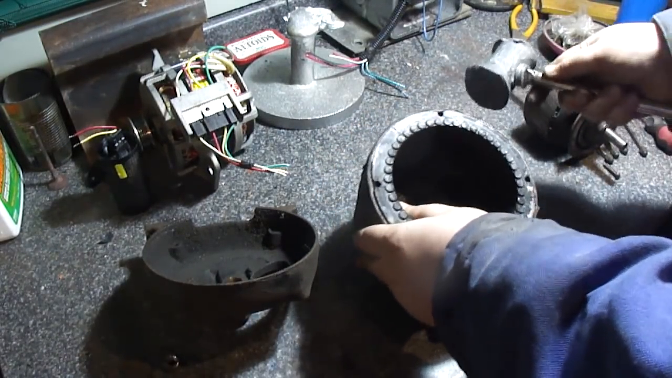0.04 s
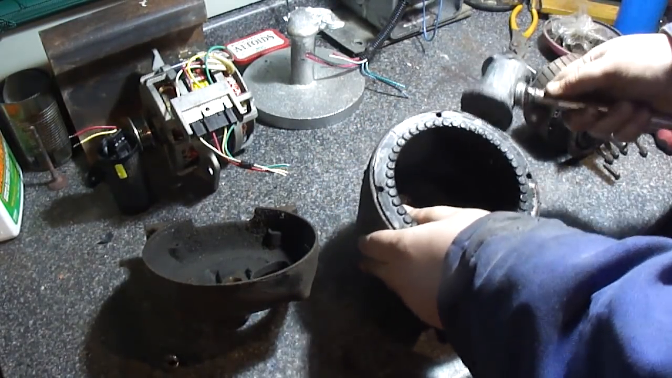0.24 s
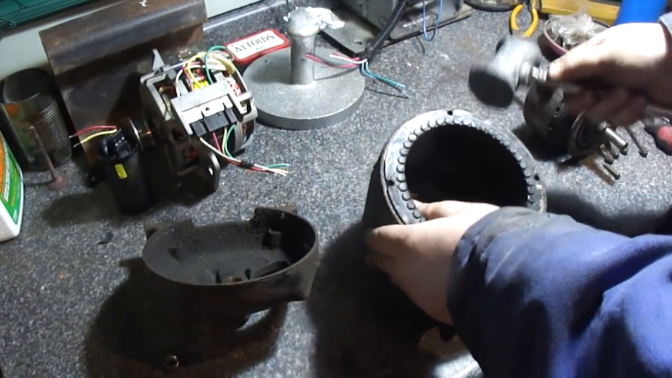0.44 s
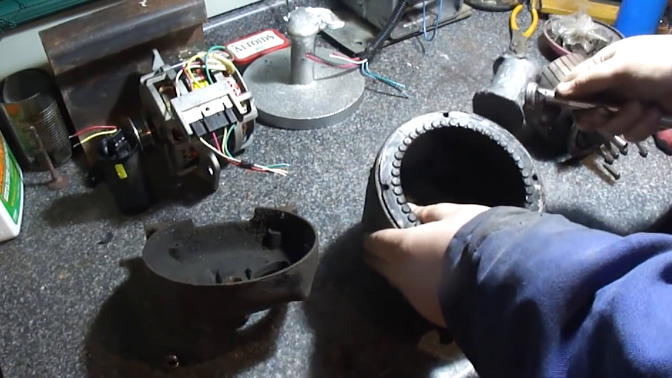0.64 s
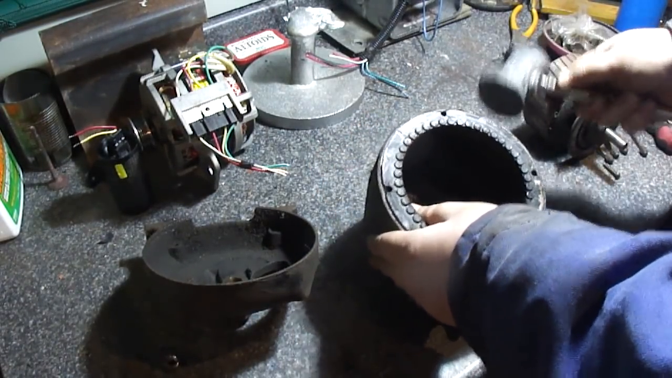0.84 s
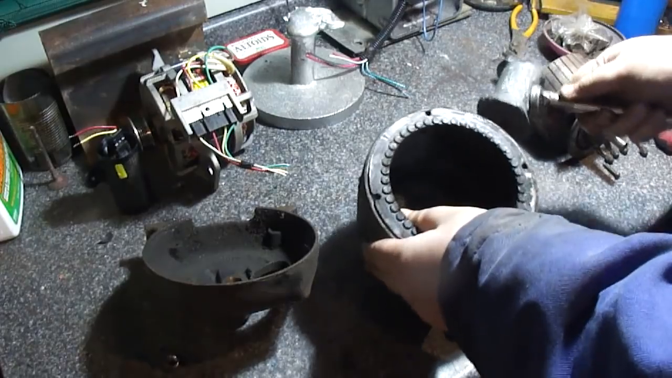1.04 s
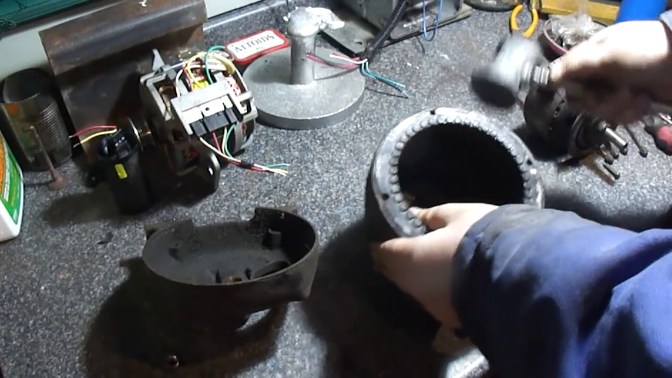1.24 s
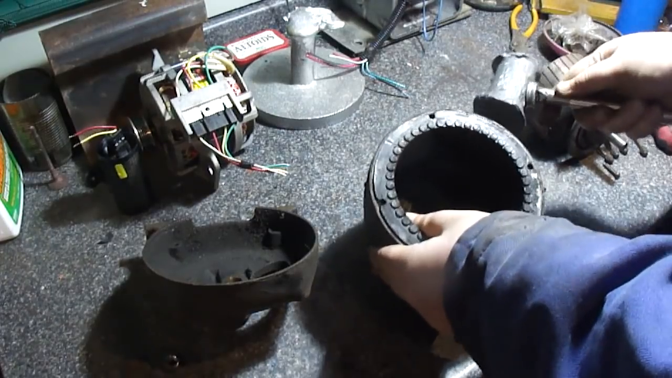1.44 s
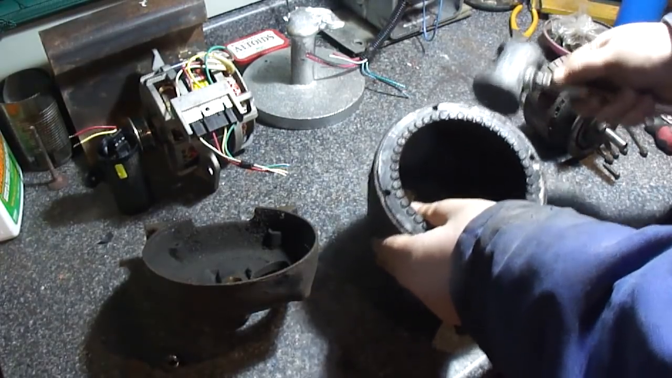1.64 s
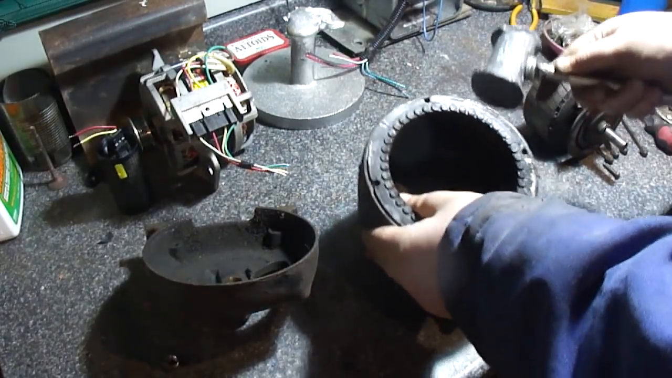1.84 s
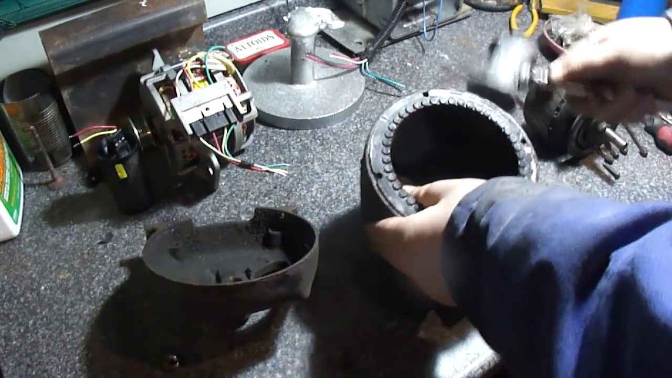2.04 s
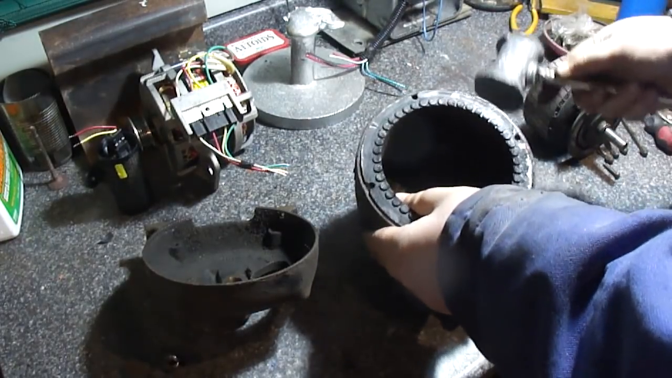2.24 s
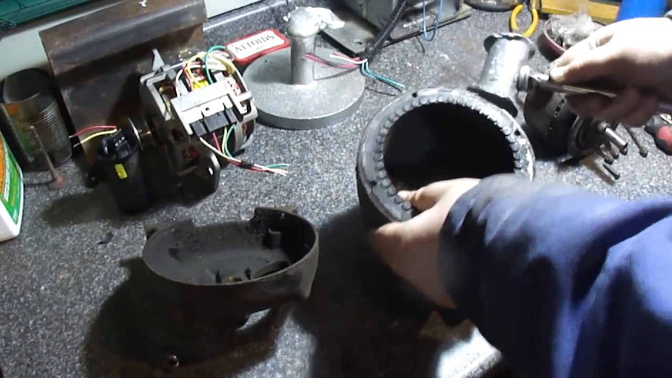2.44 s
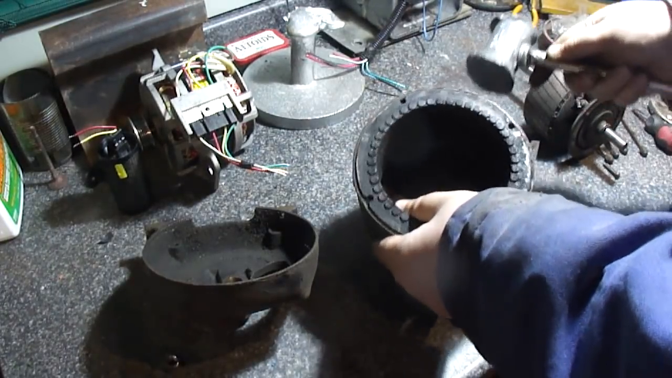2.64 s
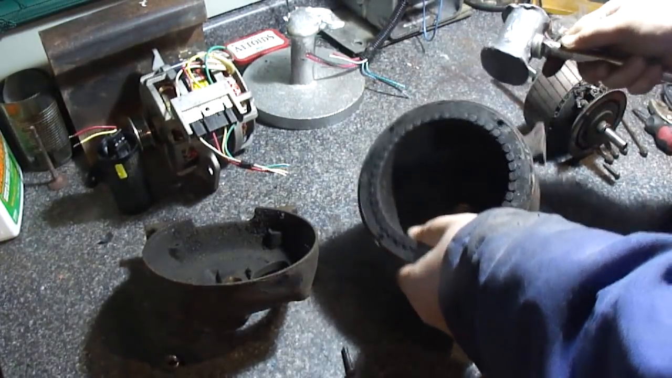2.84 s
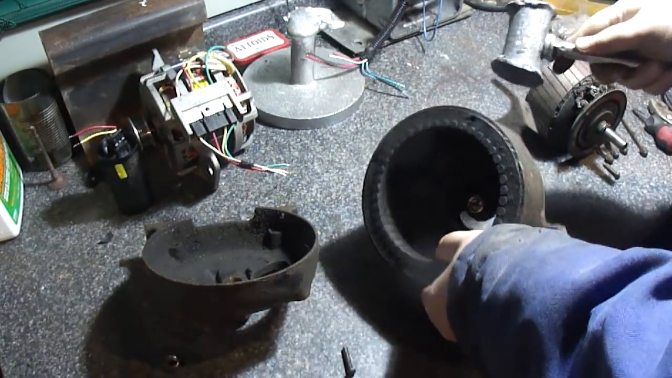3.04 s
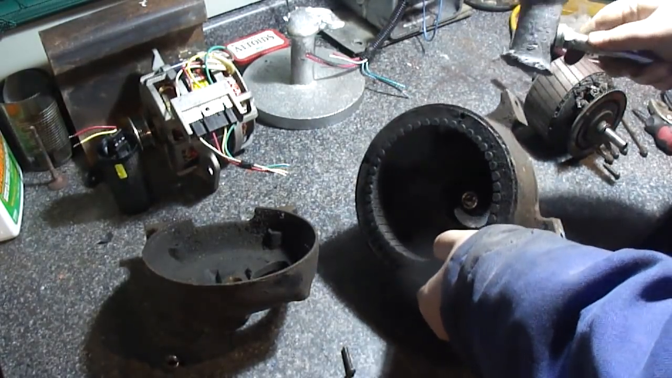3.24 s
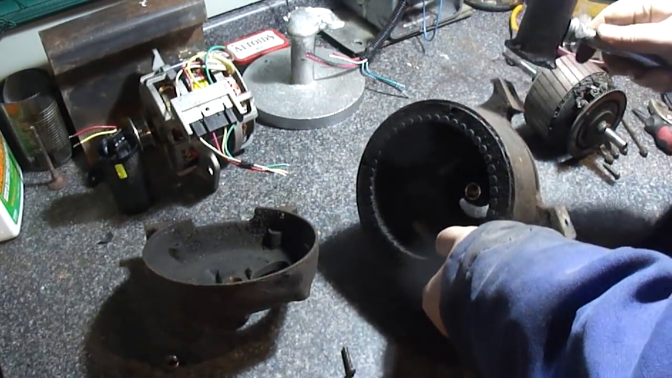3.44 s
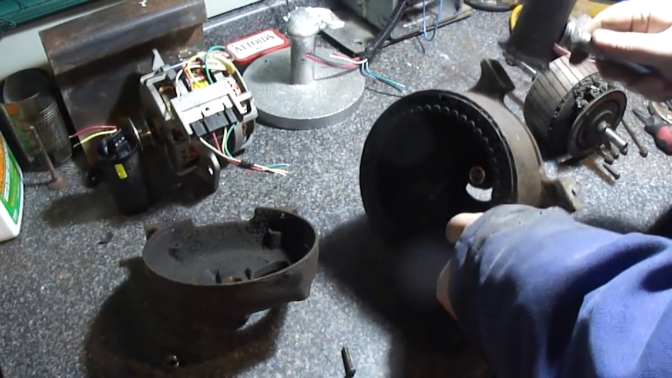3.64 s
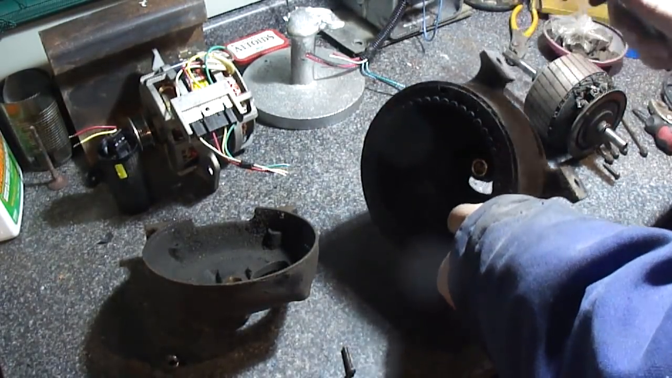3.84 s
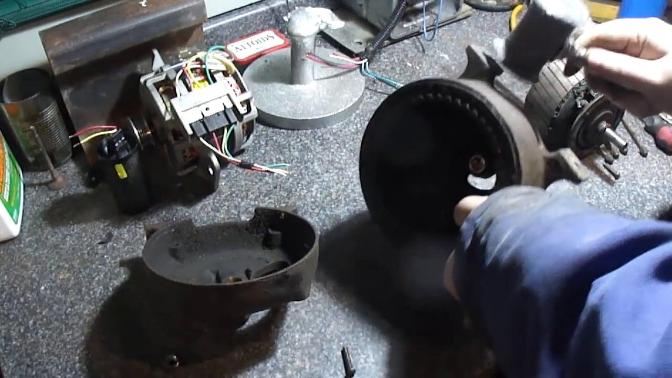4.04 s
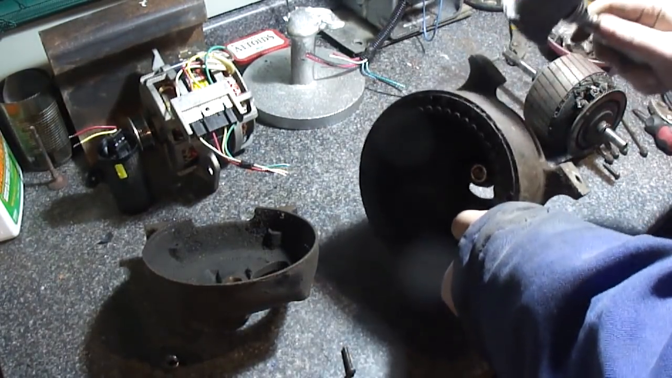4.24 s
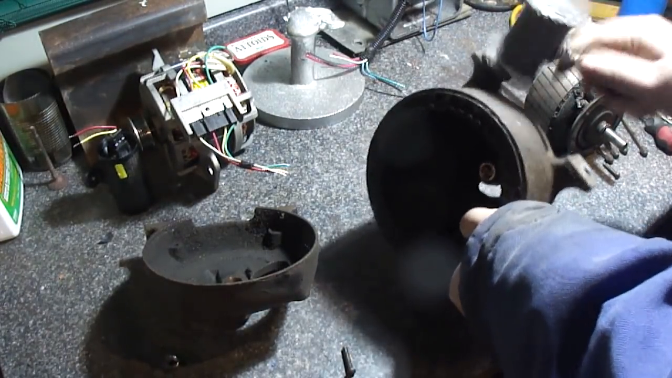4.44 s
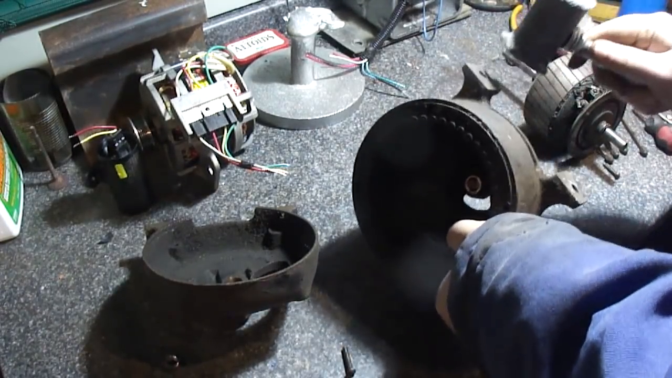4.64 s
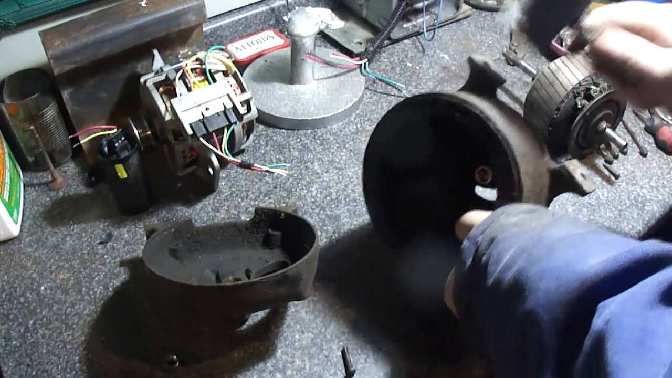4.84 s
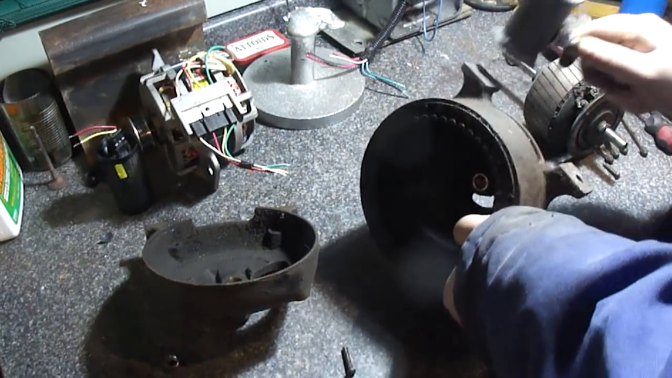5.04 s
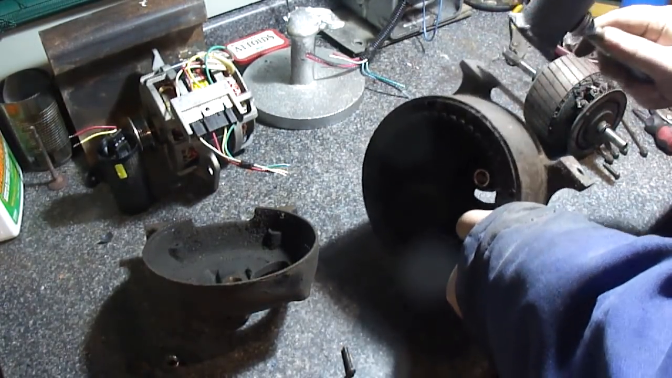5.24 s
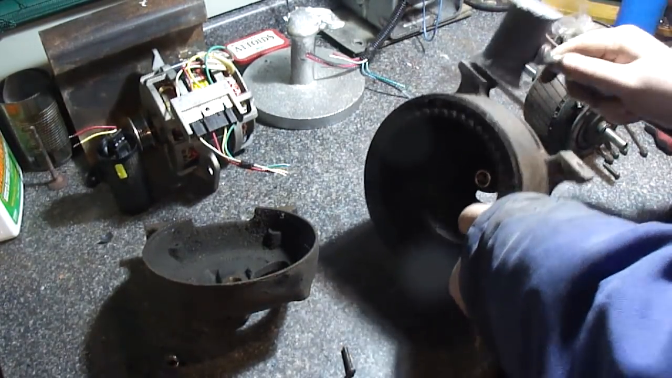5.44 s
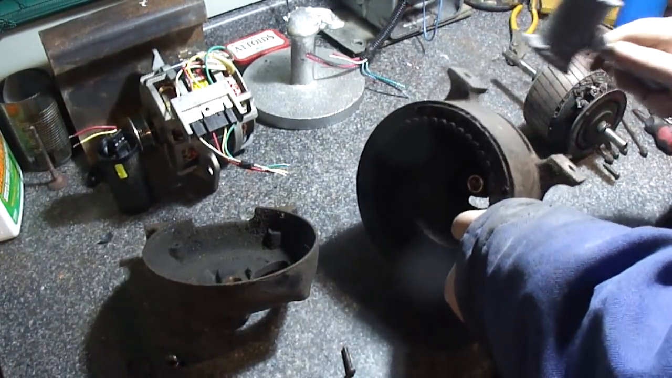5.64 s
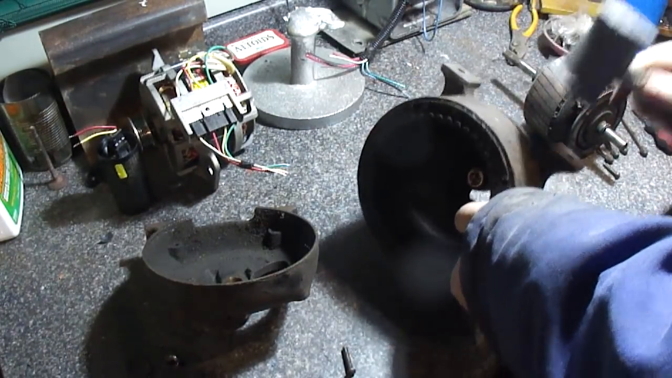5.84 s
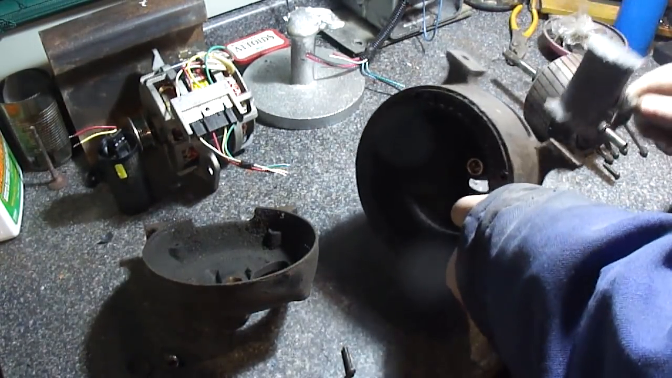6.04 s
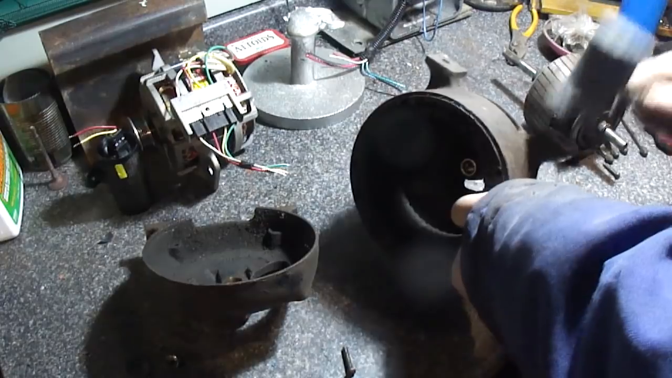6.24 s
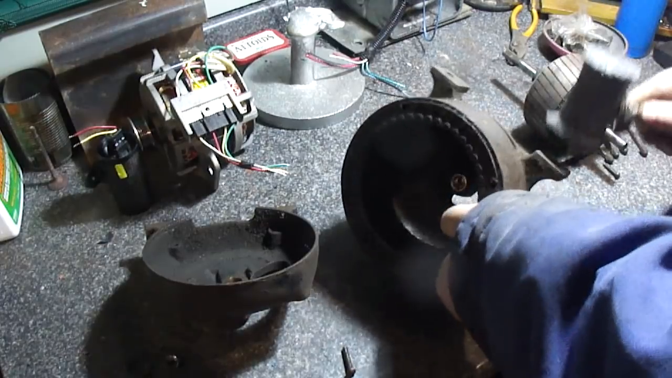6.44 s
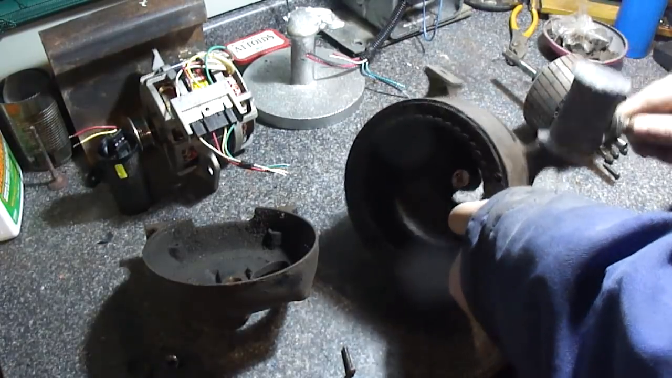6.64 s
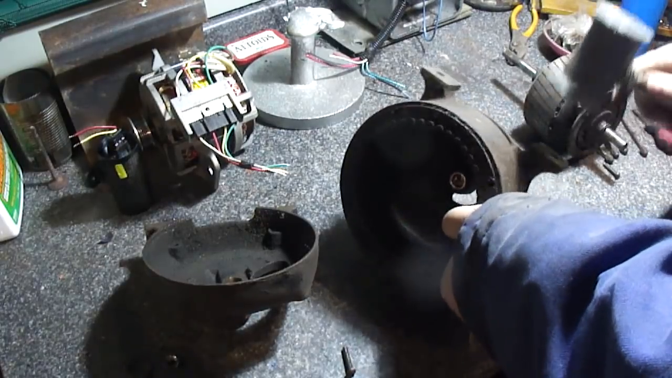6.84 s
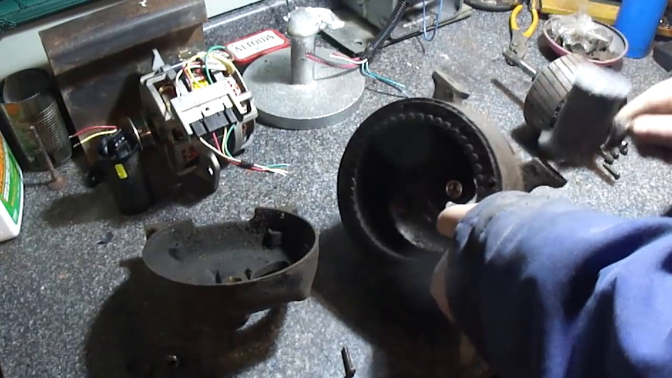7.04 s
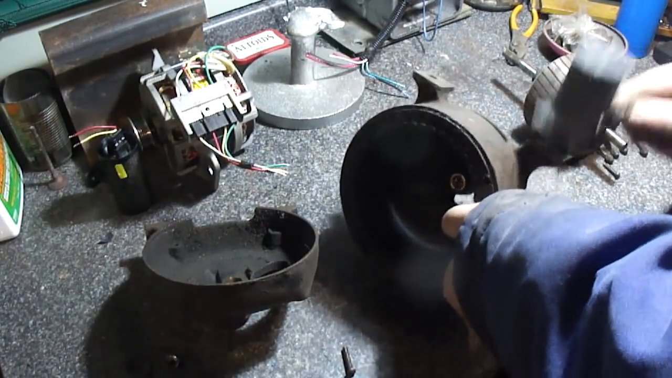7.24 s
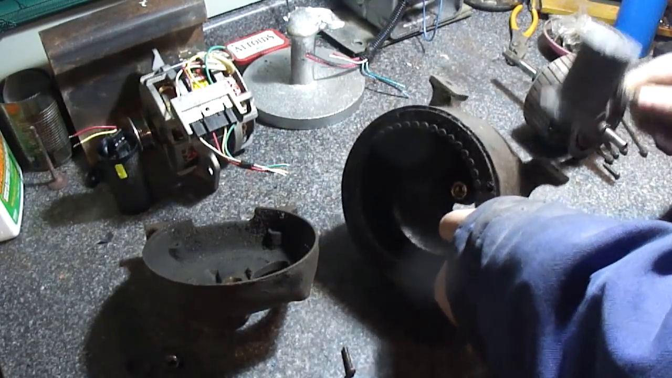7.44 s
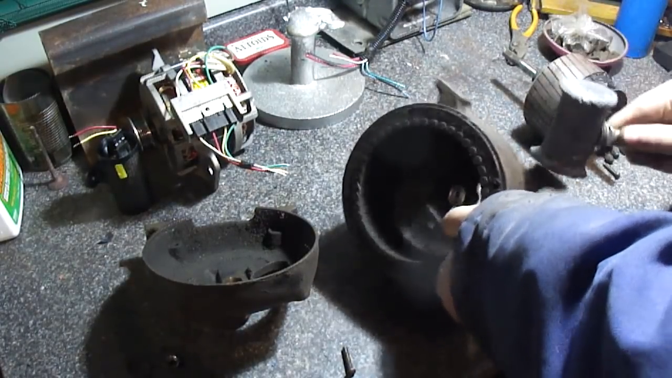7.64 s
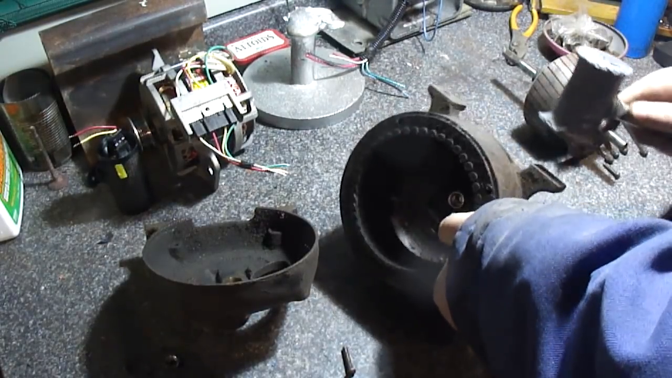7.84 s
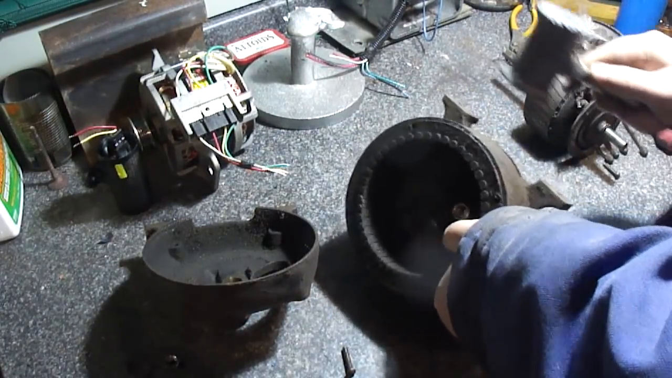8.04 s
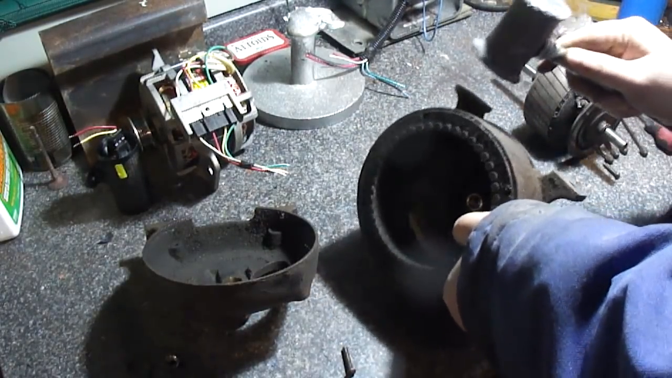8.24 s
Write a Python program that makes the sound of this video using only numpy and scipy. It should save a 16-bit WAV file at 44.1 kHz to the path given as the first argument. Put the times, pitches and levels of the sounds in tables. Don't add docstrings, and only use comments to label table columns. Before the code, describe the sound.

In a hard, echoing workshop, a mallet hits a heavy metal housing at an even pace, about every 0.4 seconds, with cracking attacks, short mid-pitched rings and dull bench thuds. After a pause and a knock as the piece is turned, four slower, sharper blows follow, then six quicker, grittier ones. It ends with a light set-down knock. The close microphone clamps each blow and lifts the room echo, over low steady noise.

```python
import sys
import numpy as np
from scipy import signal
from scipy.io import wavfile
from scipy.ndimage import uniform_filter1d

SR = 44100
rng = np.random.default_rng(int(sys.argv[2]) if len(sys.argv) > 2 else 0)


def dump_mix(stems):
    frames = np.atleast_2d(stems).T
    limited = np.clip(frames, -1, 1)
    pcm = np.round(limited * 32767).astype(np.int16)
    wavfile.write(sys.argv[1], SR, pcm)


def magnitude_from_level(level_db):
    exponent = np.asarray(level_db, float) / 20
    return 10 ** exponent


N = 366471
SIZE = 2 ** 15

# start in seconds, blow strength in dB, bench thud in dB, ring in
# dB, brightness in dB per octave. The first falls before the scene opens.
LYING_FLAT_BLOWS = [
    (-.17, -4, -4, -1.5, -4.5),
                    (0.2, 2, -4.5, -2, -6.5),
    (.547, 4.5, -4, -4.5, -5.5),
    (.939, 2.5, -5, -2.5, -5),
    (1.335, 3, -9, -1.5, -1),
    (1.735, 1, -33, 2, 3),
    (2.1147, -4.5, -40, 2.5, -6),
    (2.474, 4, -34, 2, -3),
]
# start in seconds, blow strength in dB,
# low ring in dB, ring in dB, brightness in dB per octave.
TILTED_BLOWS = [
    (4.029, 2, 11.5, -14, -6),
    (4.507, 2, -22, 0.8, -6),
    (4.946, 2.5, -12, 3.5, -5),
    (5.405, -0.2, -2, 2.1, -5.5),
]
RIM_BLOWS = [
    (5.959, -1.5, -10, 0.5, -1.5),
    (6.334, -3.5, -5, 0.5, 0.5),
    (6.684, -3.5, 2.5, -1, -0.5),
    (7.008, 1.5, -3.5, -0.5, -0.5),
    (7.328, -4.5, 7.5, -5.5, -2),
    (7.644, -0.8, -23, 2, -0.5),
]
# frequency in Hz, level in dB per Hz.
BODY_FLAT = [(88, -99.5), (150, -63), (569, -23), (692, -18), (1220, -17.5), (1620, -6.5), (1840, -16.5),
             (2820, -32), (3430, -32.5), (5250, -44), (10500, -62), (13600, -99), (22000, -120)]
BODY_TILTED = [(88, -113.5), (150, -63), (521, -26), (704, -12), (919, -11.5), (1620, -5), (1910, -13),
               (2580, -7), (3190, -15), (5160, -19), (10500, -32), (13600, -74), (22000, -120)]
BODY_RIM = [(88, -95.5), (150, -52.5), (521, -17.5), (704, -2.5), (903, -2), (1220, 4.5), (2160, -5),
            (3490, -8), (3950, -13), (7900, -21.5), (10500, -36.5), (13600, -60), (22000, -120)]
# frequency in Hz, t60 in seconds, level in dB flat, tilted, on the rim.
CASTING_MODES = [(721, 0.09, -31, -16.5, -13), (1115, 0.049, -34.5, -2.5, -3.5),
                 (1202, 0.11, -13.5, -39, -15), (1380, 0.027, -27, -14, -16),
                 (1422, 0.039, -49.5, 2.5, -16), (1520, 0.013, 8.5, -4, -25.5), (1634, 0.15, 3.5, -6, -30),
                 (1633, 0.17, 2, -11.5, -17.5), (1653.4, 0.081, 2, -5.5, -9), (1706, 0.047, 7, 0.5, -7.5),
                 (2560, 0.019, -10, 1, 2.5), (3397, 0.032, -19.5, -5, -4), (3470, 0.036, -14, -21, -8),
                 (4160, 0.045, -26.5, -15, -18), (4410, 0.028, -15.5, -16, -10),
                 (5100, 0.0091, -20.5, -12, -13.5), (6280, 0.011, -26, -13, -14)]
# frequency in Hz, level in dB per Hz.
FACE_RAISED = [(35, -11.5), (60, -59.5), (272, -13), (1290, 10.5), (3200, -5), (5150, -5.5), (8830, -67),
               (10500, -40), (13600, -64), (22000, -120)]
FACE_FLAT = [(35, -33), (60, -40.5), (954, 7), (1900, -9.5), (2360, 5), (4520, -17), (9220, -51.5),
             (10500, -38), (13600, -91), (22000, -120)]
# level in dB flat, tilted, on the rim.
CRACK_DB = [-11, -3, -10]
SIZZLE_DB = [-10.5, -12.5, -0.5]


def blow(row, posture, walls):
    s, strength_db, low_db, ring_db, bright_db = row
    hz, t60, *levels = np.transpose(CASTING_MODES)
    low_shift_db = (low_db - 2.0) * (posture > 0)
    high_shift_db = bright_db * np.log2(hz / 1500) * 0.53
    mode_db = levels[posture] + np.where(hz < 1500, low_shift_db, high_shift_db) + ring_db - 16.0
    sound = soft(ring(hz, t60, mode_db), 0.0012)
    body = [BODY_FLAT, BODY_TILTED, BODY_RIM][posture]
    dense = burst(body, 1, 12.37, bright_db + 3.5, chatter=0)
    sound = sound + dense
    if posture == 0:
        sound = sound + bench(0.86, low_db - 6.5)
    crack_db = CRACK_DB[posture] - 0.8 * strength_db
    face = FACE_RAISED if posture else FACE_FLAT
    crack = burst(face, 0.0037, 16.5 + crack_db, bright_db - 0.8, chatter=0.08)
    sizzle = burst(TICK_COLOUR, 0.077, 17.0 + crack_db + SIZZLE_DB[posture], 0.83, chatter=0.88)
    wet = in_shop(sound, walls, 1.8, same=0.43)
    wet = wet - 0.47 * dense
    return s, magnitude_from_level(strength_db + 12.0) * soft(wet + crack + sizzle, 0.00048)


# start in seconds, frequency in Hz, level in dB.
ACCENTS = [(1.734, 5240, -6.5), (4.027, 5110, -4), (4.029, 3460, -3.5), (4.507, 721, -14),
           (4.507, 5870, -7), (4.946, 6510, -7), (5.405, 6450, -11), (5.405, 5060, -9.5),
           (5.96, 1634, -0.5), (5.958, 2640, -9.5), (6.335, 1222, -9), (6.685, 1186, -11.5),
           (7.007, 1641, 0.5), (7.327, 1755, -12.5), (7.643, 1654, -4.5)]


def accent(row, walls):
    s, hz, db = row
    split = 0.02 * np.clip(hz / 3000 - 1, 0, 2)
    cluster = hz * (1 + split * np.array([-1, 0, 1]))
    t60 = 0.13 * 1000 / hz
    return s, in_shop(soft(ring(cluster, t60, db), 0.0022), walls, 2.9, same=0.3)


# frequency in Hz, t60 in seconds, level in dB.
BENCH_MODES = [(112.2, 0.39, -29), (141, 0.1, -18), (224, 0.061, -9), (270, 0.07, -3.5), (311.4, 0.059, -4),
               (390, 0.071, -7), (470, 0.065, -4), (596, 0.032, 3), (780, 0.055, -8)]


def bench(damping, db):
    hz, t60, level_db = np.transpose(BENCH_MODES)
    t = np.arange(SIZE)[:, None] / SR
    decay = magnitude_from_level(level_db + db - 60 * t / (damping * t60))
    modes = decay * np.sin(2 * np.pi * (hz * t + rng.random(len(hz))))
    return soft(modes.sum(axis=1), 0.0039)


# start in seconds, level in dB, pitch as a factor,
# sharp tick in dB, bass in dB.
KNOCKS = [
    (.118, -7.5, 1.2, -40, -8),
    (.411, -6.5, 1.58, -39.5, -1),
    (.711, -2.5, 0.93, -27, -3.5),
    (0.916, -7.5, 1.25, -49, -14),
    (3.1076, 1, 1.007, -38, 0.5),
    (8.047, -6.5, 1.08, -30, -11.5),
    (8.23, -42, 1.1, -17, -8.5),
]
# frequency in Hz, t60 in seconds, level in dB.
KNOCK_MODES = [(74, 0.24, -21), (140, .14, -10), (251, 0.077, -8.5), (383, 0.034, 4), (597, 0.061, -10.5),
               (773, 0.078, -13), (1150, .03, -17)]
# frequency in Hz, level in dB per Hz.
THUMP_COLOUR = [(24, -49.5), (40, -14), (130, -16.5), (445, -6), (980, -16), (1390, -14.5), (4000, -38.5),
                (5200, -71), (8800, -120)]


def knock(row, walls):
    s, db, pitch, tick_db, bass_db = row
    hz, t60, level_db = np.transpose(KNOCK_MODES)
    wood = soft(ring(hz * pitch, t60, level_db + bass_db * (hz < 300) - 13.5), 0.0018)
    grit = burst(TICK_COLOUR, 0.01, tick_db + 14.0)
    thump = soft(burst(THUMP_COLOUR, 0.062, -1.4, chatter=0.1), 0.0012)
    return s, magnitude_from_level(db) * in_shop(wood + grit + thump, walls, -10.0)


# start in seconds, level in dB.
TICKS = [
    (0.3067, -42),
    (0.4377, -53.5),
    (3.8811, -5.5),
]
# frequency in Hz, level in dB per Hz.
TICK_COLOUR = [(290, -57), (500, -18.5), (2830, -6.5), (3940, -8.5), (4250, -6.5), (6470, -15),
               (10500, -34), (13600, -47.5), (22000, -120)]


def tool_tick(row, walls):
    s, db = row
    return s, magnitude_from_level(db) * in_shop(burst(TICK_COLOUR, 0.049, 4.1, chatter=0.6), walls, -9.5)


def ring(hz, t60, db):
    t = np.arange(SIZE)[:, None] / SR
    sign = (-1.) ** np.arange(len(hz))
    decay = magnitude_from_level(db - 60 * t / np.clip(t60, 0.005, 3))
    return (sign * decay * np.sin(2 * np.pi * hz * t)).sum(axis=1)


def burst(colour, t60, db, slope_db=0., chatter=0.4):
    hz = abs(np.fft.fftfreq(4096, 1 / SR))
    tilt_db = slope_db * np.log2(np.clip(hz, 1500, 1e4) / 1500)
    gain = np.log(magnitude_from_level(read(colour, hz) + tilt_db) + 1e-5)
    taps = np.fft.ifft(np.exp(gain - 1j * signal.hilbert(gain).imag)).real[:2048]
    taps = taps * np.hanning(4096)[2048:]
    push = chatter * rng.standard_normal(SIZE) * magnitude_from_level(-60 * np.arange(SIZE) / SR / max(t60, 0.001))
    push[0] = 1
    out = signal.fftconvolve(push, taps)[:SIZE]
    return magnitude_from_level(db) * out / np.linalg.norm(out)


def soft(x, contact_s):
    return x * (1 - np.exp(-(np.arange(len(x)) / SR / max(contact_s, 1e-5)) ** 2))


def in_shop(x, walls, wet_db, same=0.41):
    tail = same * walls + np.sqrt(1 - same ** 2) * shop_tail()
    return x + magnitude_from_level(wet_db) * signal.fftconvolve(x, tail)[:SIZE]


# frequency in Hz, t60 in seconds.
SHOP = [(150, 0.4), (500, 0.44), (1500, 0.51), (4000, 0.42), (9000, 0.37)]


def shop_tail(rise_s=0.052, near=0.5):
    hz, t, z = signal.stft(rng.standard_normal(SIZE), SR, nperseg=256)
    tail = signal.istft(z * magnitude_from_level(-60 * t / read(SHOP, hz)[:, None]), SR, nperseg=256)[1][:SIZE]
    near_t60_s = 0.12
    shelves = near * soft(tail, 0.0003) * magnitude_from_level(-60 * np.arange(SIZE) / SR / near_t60_s)
    tail = shelves + soft(tail, rise_s)
    return tail / np.linalg.norm(tail)


# frequency in Hz, level in dB per Hz.
HUM_COLOUR = [(15, -30), (25, -14.5), (136, -13), (374, -8), (604, -5.5), (668, -6.5), (818, -6.5),
              (2820, -13.5), (3280, -17), (4800, -21), (5720, -22.5), (9490, -30), (10500, -41.5),
              (13600, -60), (22000, -120)]


def hum():
    frames, hz = N // 256 + 5, np.fft.rfftfreq(1024, 1 / SR)
    a, b, patches = rng.standard_normal((frames, 513, 3)).T
    patches = uniform_filter1d(patches, 12, 0)
    patches = evened(uniform_filter1d(patches, 14, 1))
    z = (a + 1j * b) * magnitude_from_level(read(HUM_COLOUR, hz)[:, None] + 0.41 * patches)
    return magnitude_from_level(-47.5) * evened(signal.istft(z, nperseg=1024, noverlap=768)[1][:N])


def evened(x):
    return x / np.sqrt(np.mean(x ** 2) + 1e-20)


def read(points, hz):
    f, value = np.transpose(points)
    return np.interp(np.log(hz + 1), np.log(f + 1), value)


def add(mix, s, sound):
    at = round(s * SR)
    sound = sound[max(-at, 0):]
    part = mix[max(at, 0):][:len(sound)]
    part += sound[:len(part)]


def scene():
    mix, walls = hum(), shop_tail()
    for posture, rows in enumerate([LYING_FLAT_BLOWS, TILTED_BLOWS, RIM_BLOWS]):
        for row in rows:
            add(mix, *blow(row, posture, walls))
    for play, rows in [(knock, KNOCKS), (tool_tick, TICKS), (accent, ACCENTS)]:
        for row in rows:
            add(mix, *play(row, walls))
    return np.array([mix, mix])


def gain_control(x, knee_db=-16.0, recover_db_per_s=206.5, firm=0.64, grip_s=0.00012, late_s=0.00069):
    power_db = 10 * np.log10(abs(signal.lfilter([1 / 60], [1, -59 / 60], x ** 2)) + 1e-12)
    fall = np.arange(N) * recover_db_per_s / SR
    held_db = np.maximum.accumulate(power_db + fall) - fall
    over_db = np.maximum(held_db - knee_db, 0)
    over_db = np.interp(np.arange(N) - late_s * SR, np.arange(N), over_db)
    r = np.exp(-1 / (grip_s * SR))
    y = x / magnitude_from_level(firm * signal.lfilter([1 - r], [1, -r], over_db))
    return y / (1 + abs(y / 0.92) ** 4) ** 0.25


# frequency in Hz, share replaced by noise.
FILL = [(4700, 0.0041), (5000, 0.9), (5800, 0.89), (7500, 0.89), (10500, 1)]


def noise_fill(x):
    hz, t, z = signal.stft(x, SR, nperseg=512)
    level = np.sqrt(uniform_filter1d(abs(z) ** 2, size=7, axis=0) + 1e-20)
    loud = level[hz > 3000].sum(axis=0)
    steady = np.roll(loud, -1) < 2.5 * np.roll(loud, 2)
    shift = 1 - 0.18 * np.repeat(rng.random(len(t)), repeats=4)[:len(t)]
    share = np.clip(read(FILL, hz[:, None] * shift), 0, 0.99) * steady
    a, b = rng.standard_normal((len(t), len(hz), 2, 2)).T
    both = np.sqrt(1 - share ** 2) * z + 0.68 * share * level * (a + 1j * b)
    return signal.istft(both, SR, nperseg=512)[1][:, :N]


def roll_off(x):
    return signal.sosfilt(signal.butter(12, 10680, fs=SR, output="sos"), x)


def record(dry):
    low_cut_hz, coupling_hz, edge_hz, trim_db = 50., 120., 10220, -0.8
    thin = signal.sosfilt(signal.butter(1, low_cut_hz, "high", fs=SR, output="sos"), dry[0])
    held = signal.sosfilt(signal.butter(1, coupling_hz, "high", fs=SR, output="sos"), gain_control(thin))
    edge = signal.firwin(255, edge_hz, window=("kaiser", 8), fs=SR)
    wide = signal.oaconvolve(noise_fill(held) * magnitude_from_level(trim_db), edge[None], "same")
    return roll_off(wide)


dry = scene()
out = record(dry)
dump_mix(out)
```